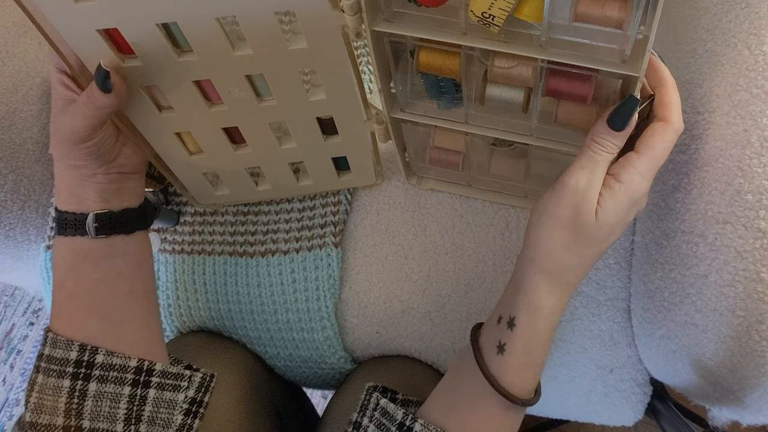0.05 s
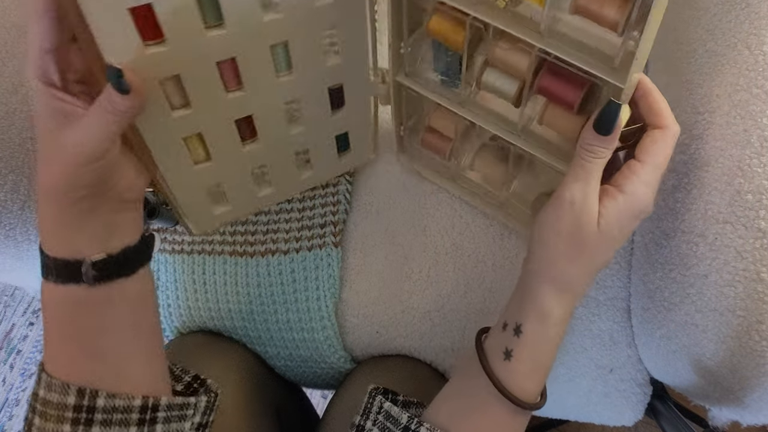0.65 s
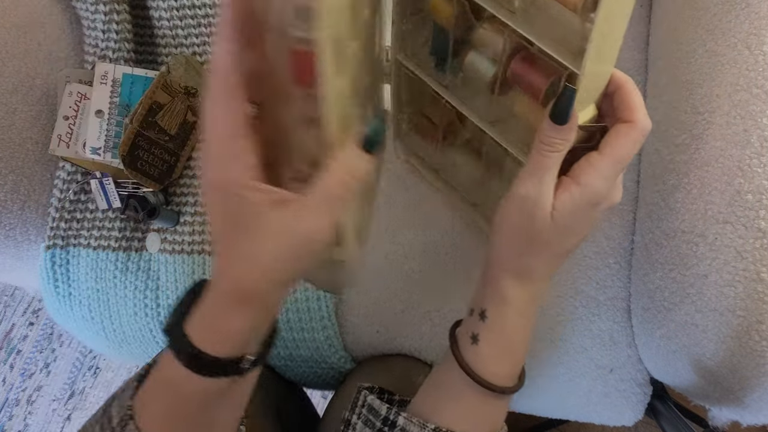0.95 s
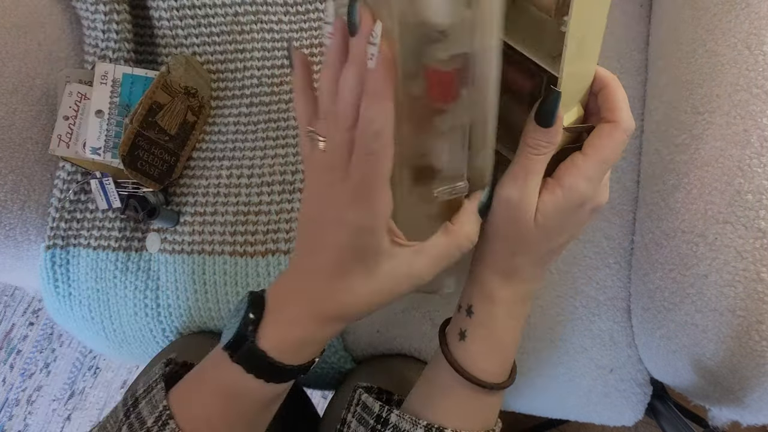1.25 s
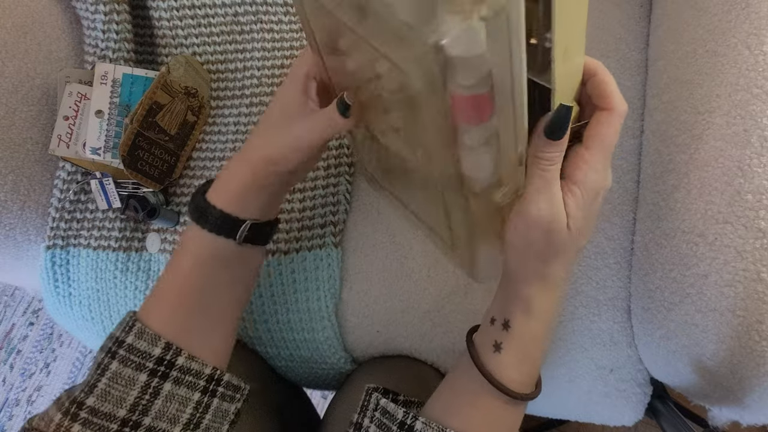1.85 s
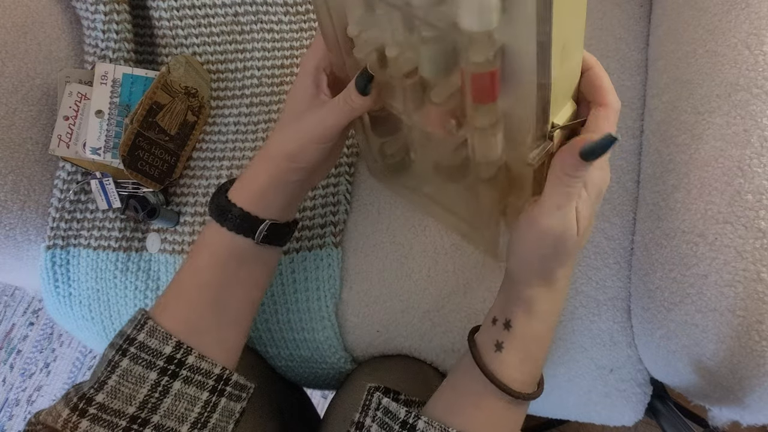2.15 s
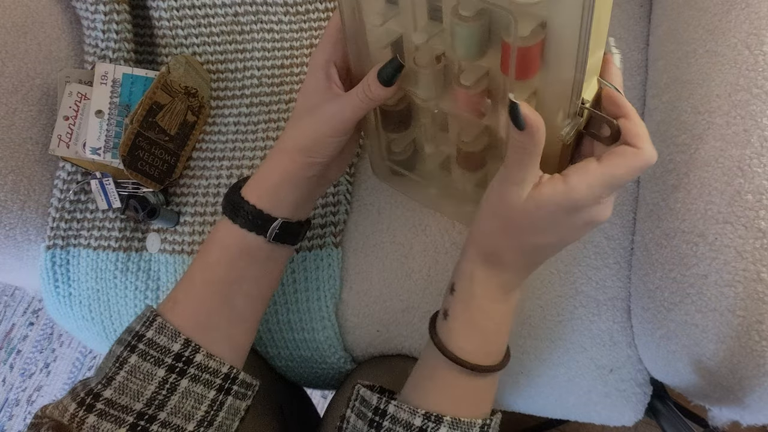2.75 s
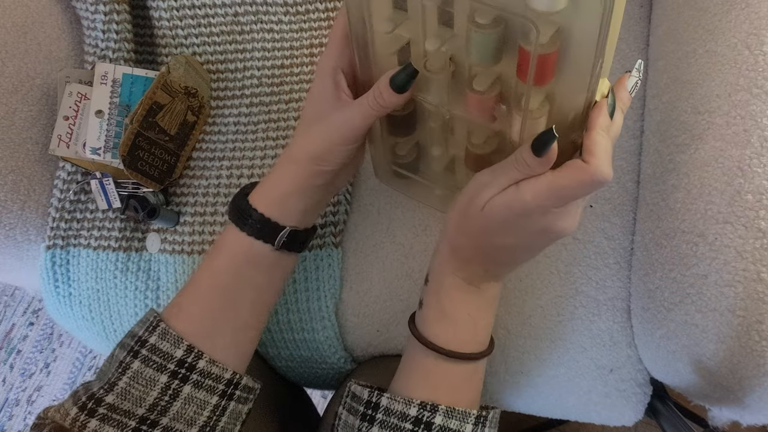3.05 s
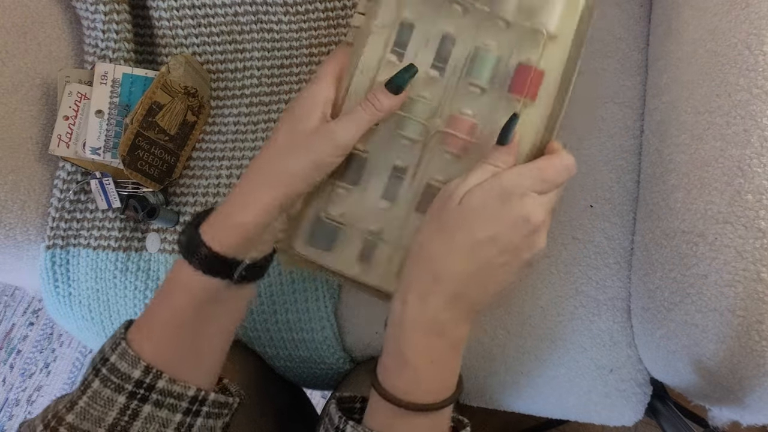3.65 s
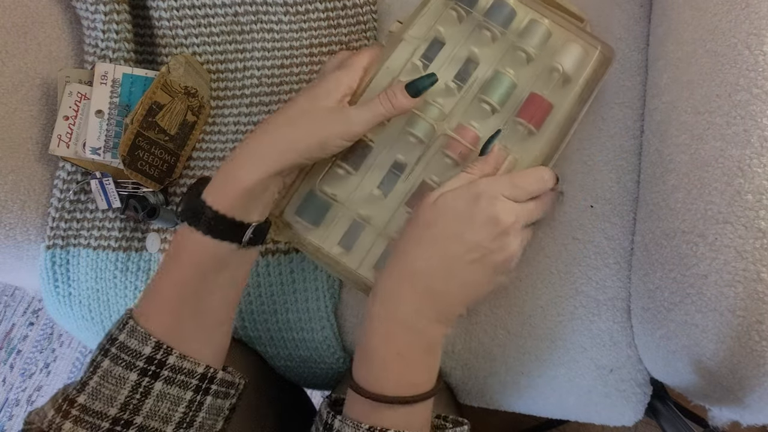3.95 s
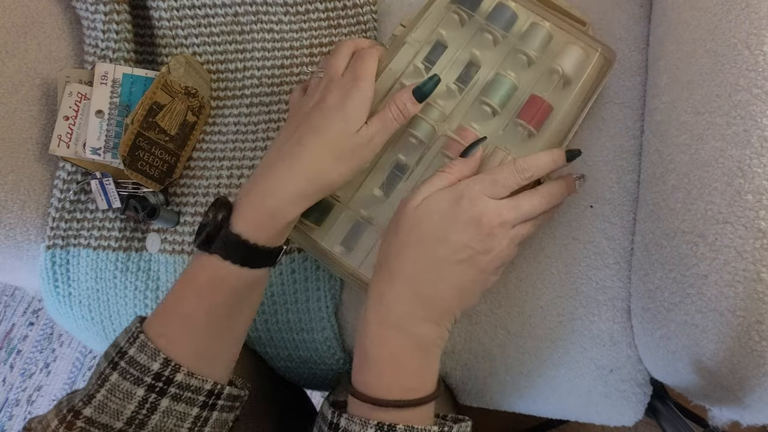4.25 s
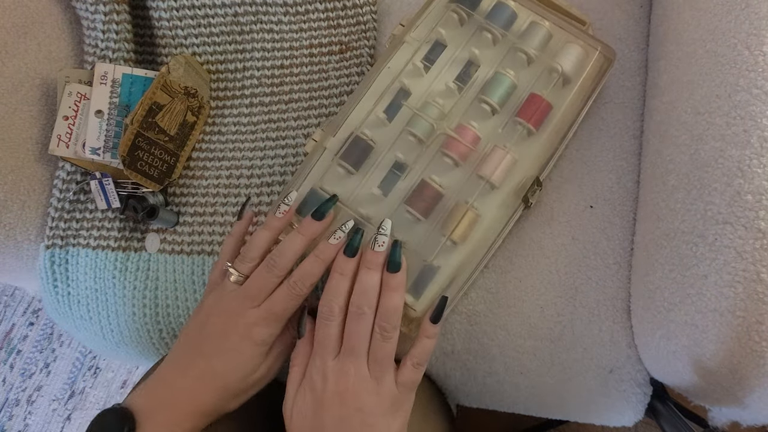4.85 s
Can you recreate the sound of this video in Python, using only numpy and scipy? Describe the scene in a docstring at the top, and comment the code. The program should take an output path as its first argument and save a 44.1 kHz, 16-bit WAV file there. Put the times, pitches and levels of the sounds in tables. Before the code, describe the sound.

Close up in a small, quiet room, hands slide softly over an open plastic case of thread spools, with light ticks. The lid clacks shut and the spools rattle briefly inside. Two latches snap one after the other, the second with a slight metallic ring. The case is laid on a sofa with soft knocks, pats and strokes, while a very faint engine drone rises far outside.

```python
"""A small, soft room; a stereo microphone pair close to a plastic case of thread spools on a sofa.
Hands slide over the open shell and swing the lid; nails and spools tick, palms pat, the frame squeaks.
Near 2 s the halves clack together and the spools rattle in their trays, while far outside an engine
slowly gathers speed. Two latches snap, near 3 s and 3.5 s, and the case is laid flat with soft knocks
and strokes. Knocks and rubbing take their colour from the resonances of the hollow shell."""
import sys
import numpy as np
from scipy import signal
from scipy.fft import rfft, irfft, next_fast_len
from scipy.io import wavfile
from scipy.ndimage import uniform_filter1d

SR = 44100
rng = np.random.default_rng(int(sys.argv[2]) if len(sys.argv) > 2 else 0)


def generate_wav(signal):
    """Clip the signal to [-1, 1] and save it as 16-bit WAV at the path in sys.argv[1]."""
    frames = np.transpose(np.atleast_2d(signal))
    scaled = np.clip(frames, -1, 1) * 32767
    pcm = np.round(scaled).astype(np.int16)
    wavfile.write(sys.argv[1], SR, pcm)


N = 225517
RING_SAMPLES, ONSET_SAMPLES = 22050, 882
SWING_END_S, SHUT_AT_S = 0.95, 2.05
MIC_LAG_S = 7.5e-5  # sound reaches the left microphone first


def amp(db):
    """Decibels to amplitude."""
    return 10 ** (np.asarray(db) / 20)

def unit_rms(x):
    """Scales to rms 1."""
    return x / np.sqrt(np.mean(x ** 2) + 1e-20)

def at_level(x, db, size=ONSET_SAMPLES):
    """Sets the rms of a sound's first moments."""
    return x * amp(db) / np.sqrt(np.mean(x[:, :size] ** 2) + 1e-20)

def curve_at(points, hz):
    """Reads a table on a log-frequency axis."""
    table_hz, value = np.transpose(points)
    return np.interp(np.log(hz + 1), np.log(table_hz + 1), value)

def bins(size):
    """Frequencies of a spectrum of this many samples."""
    return np.fft.rfftfreq(size, 1 / SR)

def add(mix, start_s, sound):
    """Lays a stereo sound into the mix."""
    part = mix[:, round(start_s * SR):][:, :sound.shape[1]]
    part += sound[:, :part.shape[1]]

def panned(x, left_db):
    """Makes the left microphone louder than the right by left_db."""
    return x * amp(np.array([[left_db], [-left_db]]) / 2)

def band(x, lo_hz, hi_hz, order=3):
    """Causal band-pass."""
    sos = signal.butter(order, [lo_hz, min(hi_hz, SR / 2 - 1000)], "band", fs=SR, output="sos")
    return signal.sosfilt(sos, x)

def coloured(x, gain_at):
    """Minimum-phase filter; gain_at gives its gain at each frequency."""
    log_gain = np.log(gain_at(abs(np.fft.fftfreq(4096, 1 / SR))))
    taps = np.fft.ifft(np.exp(np.conj(signal.hilbert(log_gain)))).real
    return signal.fftconvolve(x, taps[None, :len(taps) // 2], axes=1)[:, :x.shape[1]]

# How alike the two microphones hear the room: frequency_hz, coherence
MIC_COHERENCE = [(50, 0.82), (300, 0.9), (700, 0.69), (1500, 0.23), (4000, 0.24), (15000, 0.072)]
def pair_noise(size, gain=1):
    """Noise at two nearby microphones: partly alike, the right one a little late."""
    hz = bins(size)
    left, unrelated = rfft(rng.standard_normal((2, size)))
    alike = np.clip(curve_at(MIC_COHERENCE, hz), 0, 1)
    right = (alike * left + np.sqrt(1 - alike ** 2) * unrelated) * np.exp(-2j * np.pi * hz * MIC_LAG_S)
    return unit_rms(irfft(np.array([left, right]) * gain, size))

# Quiet air all around the microphones: frequency_hz, gain_db
AIR_SPECTRUM = [(20, -29), (38, -23.5), (54, 4), (75, -3), (110, -6.5), (170, -16.5), (300, -22),
                (600, -23), (2000, -27.5), (6000, -29), (16000, -46)]
def room_air(level_db=-62.5):
    """The room's steady, low hush."""
    hush = pair_noise(N, amp(curve_at(AIR_SPECTRUM, bins(N))))
    return panned(amp(level_db) * hush, left_db=1.5)

# Firmness of the hold, which keeps the shell creeping under hands and on the cushion: time_s, level_db
GRIP_FIRMNESS = [(0, -69), (.4, -70), (.7, -68), (1.05, -51.5), (1.22, -64), (1.38, -58), (1.47, -62.5),
                 (1.6, -54), (1.85, -61.5), (2.05, -52.5), (2.35, -65), (2.6, -62), (2.92, -53),
                 (3.35, -57), (3.7, -50.5), (3.9, -54), (4.5, -53), (5.11, -56)]
# Hands sliding over the case, close by: fastest_s, swell_s, fade_s, scrape_db, hiss_db
HAND_SLIDES = [(.03, 0.15, 0.091, -64, -67), (.48, 0.029, 0.11, -57, -60.5), (.67, 0.28, 0.21, -51.5, -56),
               (.855, 0.11, 0.16, -49.5, -54.5), (1.04, 0.11, 0.18, -50.5, -54),
               (1.22, 0.16, 0.25, -62.5, -56.5), (1.285, 0.036, 0.18, -51.5, -49),
               (1.539, 0.074, 0.086, -49, -51), (1.722, 0.038, .04, -51, -42),
               (1.748, 0.042, 0.065, -46, -57), (1.859, 0.11, 0.15, -54.5, -50),
               (2.08, 0.31, 0.16, -47, -51.5), (2.51, 0.073, 0.091, -56.5, -60),
               (2.635, 0.086, 0.092, -55.5, -55), (2.77, 0.16, 0.092, -53, -58),
               (2.89, 0.29, 0.84, -57.5, -57), (3.25, 0.097, 0.25, -77, -70),
               (3.78, 0.68, 0.17, -58.5, -79), (4.14, 0.11, 0.14, -64, -51.5), (4.5, 0.15, 0.14, -55, -47),
               (4.74, 0.43, 0.18, -62, -51)]
def hand_motion(firm_db=-52.5, crest_sharpness=1.2):
    """Strength of murmur, scrape and hiss: the grip's creep plus slides that swell and fade."""
    t = np.arange(0, N, 64) / SR
    grip_db = np.interp(t, *np.transpose(GRIP_FIRMNESS))
    scrape_power, hiss_power = 0, 0
    for fastest_s, swell_s, fade_s, scrape_db, hiss_db in HAND_SLIDES:
        speed = np.interp(t, [fastest_s - swell_s, fastest_s, fastest_s + fade_s], [0, 1, 0])
        scrape_power += (amp(scrape_db) * speed ** crest_sharpness) ** 2
        hiss_power += (amp(hiss_db) * speed ** crest_sharpness) ** 2
    creep_hiss_db = firm_db - 11.5 + 1.3 * (grip_db - firm_db)  # a power law of the grip
    murmur = np.sqrt(amp(grip_db) ** 2 + amp(-10) ** 2 * scrape_power)
    scrape = np.sqrt(amp(grip_db - 7) ** 2 + scrape_power)
    hiss = np.sqrt(amp(creep_hiss_db) ** 2 + hiss_power)
    return [np.interp(np.arange(N) / SR, t, strength) for strength in (murmur, scrape, hiss)]

def resonances(modes, hz, q):
    """Gain of the walls when hands damp each mode to a width of its pitch over q."""
    return sum(amp(db) / (1 + (2 * q * (hz - pitch_hz) / pitch_hz) ** 2) for pitch_hz, db, _ in modes)

def friction(spectrum, walls, grain_db, grain_samples):
    """Tiny uneven slips, heard through the walls."""
    size = next_fast_len(N)
    roughness = unit_rms(uniform_filter1d(rng.standard_normal(size), grain_samples))
    slips = pair_noise(size) * amp(grain_db * roughness)
    gain = amp(curve_at(spectrum, bins(size))) * walls
    return unit_rms(irfft(rfft(slips) * gain, size)[:, :N])

# The rubbed shell's low murmur and midrange scrape: frequency_hz, gain_db
MURMUR_SPECTRUM = [(40, -32), (110, -6), (220, -0.5), (310, 2.5), (480, -9.5), (900, -19), (3000, -64.5)]
SCRAPE_SPECTRUM = [(150, -30.5), (450, -2), (750, -2), (1400, -1), (2600, -1.5), (4000, -9), (9000, -36.5)]
def rubbing(modes, hiss_spectrum, hollow_db, hiss_hollow_db):
    """Hands and cloth slide on the shell: a low murmur, a hollow scrape and a fine hiss."""
    murmur, scrape, hiss = hand_motion()
    hz = bins(next_fast_len(N))
    walls = 1 + amp(hollow_db) * resonances(modes, hz, q=31)
    damped_walls = 1 + amp(hiss_hollow_db) * resonances(modes, hz, q=18)
    low = amp(-3) * murmur * friction(MURMUR_SPECTRUM, walls, grain_db=2.5, grain_samples=600)
    mid = amp(-1.8) * scrape * friction(SCRAPE_SPECTRUM, walls, grain_db=1.5, grain_samples=90)
    high = amp(0.2) * hiss * friction(hiss_spectrum, damped_walls, grain_db=1.5, grain_samples=40)
    return panned(low + mid, left_db=0.89) + panned(high, left_db=1.2)

# Skin gripping the open halves, then palms on the flat lid: frequency_hz, gain_db
GRIP_HISS = [(600, -34.5), (2500, -18.5), (4000, 2.5), (6500, 3), (10000, -1.5), (13000, -3.5),
             (16000, -1.5)]
PALM_HISS = [(600, -32), (2500, -3), (4000, 2), (6500, 5), (10000, -1), (13000, 0), (16000, -4.5)]
# Modes of the swinging lid and hinge, the open halves and the shut box: pitch_hz, level_db, free_t60_s
HINGE_MODES = [(268.4, 0, .2), (600, -5, .15), (733, 4, .15), (830, -2, .15), (1250, 3, .13),
               (1414, 5, .15), (1477, 3.5, .15), (1770, 1, .13), (2540, -10, .15), (2920, 4, .15),
               (3420, -0.5, .15), (5000, -10, .1), (7930, -4, .15)]
OPEN_MODES = [(214, -2.5, 0.33), (257.5, -13, 0.51), (366.3, -1, 0.053), (513, 2, 0.12), (586, -0.5, .1),
              (748, -1.5, 0.13), (1171, 2, 0.1), (1392, 1, 0.12), (1550, -1, 0.29), (1820, -14.5, 0.08),
              (2077, -11, 0.16), (2480, -7, 0.16), (3025, -10.5, .17), (3500, -4, .15), (4000, -12, .13),
              (4500, -5, 0.077), (4970, -2.5, .11), (6260, 1.5, 0.093), (7750, -10.5, .1)]
SHUT_MODES = [(108, -2, 0.37), (185.6, -7, 0.053), (227.6, 1.5, 0.18), (262.8, -0.5, 0.22),
              (303.2, 1.5, 0.34), (375, -4.5, 0.15), (434.5, -6, 0.15), (446.8, -5.5, 0.25),
              (536, -6, 0.23), (665, -8.5, 0.085), (745, -10, 0.065), (862, -4, 0.14), (972, 0, 0.11),
              (1189, -2, 0.13), (1295, 0.5, 0.19), (1580, -8.5, 0.13), (1802, -2, .13), (2013, -6.5, .14),
              (2613, -7, .1), (3140, -6, 0.11), (3520, -5.5, .14), (4020, -1, .12), (4680, -2.5, .1),
              (5180, 7, 0.2), (5940, 1.5, .1), (6900, -2.5, .1), (7770, -11.5, 0.33), (9300, -6.5, .07)]
def handling():
    """The rubbing changes colour as the lid swings, is gripped, and meets the tray to make one box."""
    t = np.arange(N) / SR
    swung, shut = (np.clip((t - start_s) / 0.02, 0, 1) for start_s in (SWING_END_S, SHUT_AT_S))
    lid = rubbing(HINGE_MODES, GRIP_HISS, hollow_db=6, hiss_hollow_db=8)
    halves = rubbing(OPEN_MODES, GRIP_HISS, hollow_db=7.5, hiss_hollow_db=-5.5)
    box = rubbing(SHUT_MODES, PALM_HISS, hollow_db=2, hiss_hollow_db=-24)
    return np.sqrt(1 - swung) * lid + np.sqrt(swung - shut) * halves + np.sqrt(shut) * box

def case_ring(modes, spot_hz, favour_db=7, damping=1.54):
    """Modes ring down after a blow; those near the struck spot's pitch gain up to favour_db."""
    hz, db, t60_s = np.transpose(modes)[:, :, None]
    t = np.arange(RING_SAMPLES) / SR
    scatter, skew = rng.standard_normal((2, len(modes), 1))
    db = db + 2 * scatter + favour_db * np.exp(-(np.log(hz / spot_hz) / 0.17) ** 2)
    left = amp(db) * np.exp((2j * np.pi * hz - np.log(1000) * damping / t60_s) * t)
    phase_spread = np.sqrt(np.clip(2 * (1 - curve_at(MIC_COHERENCE, hz)), 0, None))
    right = left * np.exp(-1j * (2 * np.pi * hz * MIC_LAG_S + skew * phase_spread))
    return np.array([left.sum(0).real, right.sum(0).real])

# Reverberation of the small, soft room around the sofa: frequency_hz, t60_s
ROOM_DECAY = [(100, 0.32), (300, 0.34), (1000, 0.22), (3000, 0.21), (7000, 0.2), (15000, 0.17)]
def room_tail(build_s=0.0013):
    """Diffuse reflections build up, then die away, faster in the treble."""
    hz, t, spectra = signal.stft(pair_noise(RING_SAMPLES), SR, nperseg=256)
    decay = np.exp(-np.log(1000) * t / curve_at(ROOM_DECAY, hz)[:, None])
    tail = signal.istft(spectra * decay, SR)[1][:, :RING_SAMPLES]
    return tail * (1 - np.exp(-np.arange(RING_SAMPLES) / SR / build_s))

# Colour of a knock on the plastic at close range: frequency_hz, gain_db
CONTACT_SPECTRUM = [(50, -25), (100, -4), (150, -0.5), (210, 5), (400, 5), (600, 4), (1500, -5.5),
                    (2400, -4.5), (5000, -7), (8000, -2.5), (10500, -8.5), (13500, -5.5), (16000, -14.5)]
def strike(chatter_s, start_s, spot_hz, ring_db, room_db):
    """A sharp touch and its chatter sound through the walls, open or shut; modes and room ring on."""
    modes = OPEN_MODES if start_s < SHUT_AT_S else SHUT_MODES
    t = np.arange(RING_SAMPLES) / SR
    force = pair_noise(RING_SAMPLES) * np.exp(-t / chatter_s) * np.sqrt(0.0015 / chatter_s)
    first_touch = 7.2 * np.exp(-chatter_s / 0.0027)
    force[[0, 1], [0, round(MIC_LAG_S * SR)]] += first_touch
    wall_gain = lambda hz: 0.9 + 0.5 * amp(8) * resonances(modes, hz, q=15.4)
    walls = coloured(force + amp(room_db) * room_tail(), wall_gain)
    ring = amp(ring_db) * case_ring(modes, spot_hz)
    spot_lift_db = lambda hz: 4 / (1 + (7 * (hz / spot_hz - 1)) ** 2)
    return coloured(walls + ring, lambda hz: amp(curve_at(CONTACT_SPECTRUM, hz) + spot_lift_db(hz)))

# Nails and shifting spools, close by: start_s, level_db, pitch_hz, chatter_decay_s
LIGHT_TOUCHES = [(0.4628, -58.5, 1470, 0.0055), (0.837, -52.5, 1480, 0.023), (1.273, -57.5, 1920, 0.024),
                 (1.378, -51, 1380, 0.011), (1.705, -46.5, 9100, 0.0049), (1.733, -43, 5950, 0.0065),
                 (1.914, -51.5, 625, 0.0027), (2.468, -61.5, 1250, 0.014), (2.7326, -50.5, 7600, 0.0029),
                 (2.863, -50, 2090, 0.016), (3.352, -52.5, 1240, 0.0068), (3.915, -56, 1200, 0.002),
                 (3.973, -51.5, 950, 0.019), (4.228, -52.5, 1270, 0.028), (4.39, -50.5, 1450, 0.0051),
                 (4.4742, -50.5, 600, 0.006), (4.724, -51, 6650, 0.014), (4.8994, -49, 800, .003)]
def ticks(band_ratio=2.05):
    """Light touches ring only a part of the case's range."""
    out = np.zeros((2, N))
    for start_s, db, hz, chatter_s in LIGHT_TOUCHES:
        hit = strike(chatter_s, start_s, hz, ring_db=-33, room_db=-18)
        tick = band(hit, hz / band_ratio, hz * band_ratio, order=2)
        add(out, start_s, at_level(tick, db))
    return panned(out, left_db=2)

# Borders of a blow's five bands (thump, knock, clack, crack, tick): frequency_hz
BLOW_BAND_EDGES = [60, 450, 1100, 2400, 6000, 16000]
def balanced(hit, levels_db):
    """Bends a hit's spectrum smoothly so that each band starts near its level."""
    edges = list(zip(BLOW_BAND_EDGES, BLOW_BAND_EDGES[1:]))
    centres_hz, gains_db = np.sqrt(np.prod(edges, axis=1)), np.zeros(len(edges))
    gain_at = lambda hz: amp(curve_at(np.c_[centres_hz, gains_db], hz))
    for _ in range(3):
        onset = coloured(hit[:, :ONSET_SAMPLES], gain_at)
        onset_db = np.array([10 * np.log10(np.mean(band(onset, lo, hi) ** 2)) for lo, hi in edges])
        step_db = levels_db - onset_db
        common_db = np.median(step_db)
        gains_db += common_db + np.clip(step_db - common_db, -9, 9)
    return coloured(hit, gain_at)

# How a blow spreads over those five bands: offset_db, weight_share, hardness_share
BAND_SHARES = [(0, 1, 0), (-3, 0.17, 0.048), (-0.5, 0, 0), (3.5, 0, .56), (-1, 0.021, 0.98)]
# Hard blows on the case, close by; weight is bass over clack, hardness is treble over clack:
# start_s, clack_db, weight_db, hardness_db, pitch_hz, chatter_decay_s, rise_s, left_db
HARD_BLOWS = [(0.951, -50, 0.5, -5, 900, 0.0096, 0.00021, 4.5),
              (1.3572, -57, -4, 7, 2430, 0.011, 0.00033, 3),
              (1.9314, -17.5, -22.5, -14.5, 1650, 0.0074, 0.0012, 3),
              (2.0894, -32.5, -7, -17, 1380, 0.0099, 0.00083, 3),
              (2.0981, -32, -5, -20.5, 1000, 0.025, .00055, 0.5),
              (2.1196, -34.5, 0, -22, 1280, 0.01, 0.00071, 2),
              (2.1493, -21, -2.5, -17.5, 205, 0.004, 0.00012, 3),
              (2.249, -54.5, 1, -9, 2450, 0.0069, 0.00071, 5),
              (2.968, -18, 3.5, -4, 5200, 0.0043, .0002, 0.5),
              (3.4902, -24, -5, 2.5, 4000, 0.0025, 0.0011, 1),
              (3.834, -39.5, -5, -27, 1200, 0.0091, 0.00093, 4.5),
              (4.0076, -49, 0, -22, 1300, 0.017, 0.0045, 1.5),
              (4.056, -34.5, -6, -18, 454, 0.0064, 0.0061, 2.5),
              (4.079, -44.5, -7, -9, 1310, 0.011, .0007, 5),
              (4.094, -32, -19, -23.5, 1340, 0.0056, 0.0071, 2.5),
              (4.123, -43.5, -4, -22, 1310, 0.0074, 0.00058, 0),
              (4.7044, -50, -0.5, 13, 6270, 0.0011, 0.001, 3.5)]
def blows():
    """Lid, latches and tumbling spools hit the shell; a glancing blow swells briefly before it rings."""
    out, t = np.zeros((2, N)), np.arange(1, RING_SAMPLES + 1) / SR
    offset_db, weight_share, hardness_share = np.transpose(BAND_SHARES)
    for start_s, clack_db, weight_db, hardness_db, hz, chatter_s, rise_s, left_db in HARD_BLOWS:
        hit = strike(chatter_s, start_s, hz, ring_db=-34.5, room_db=-21) * (1 - np.exp(-t / rise_s))
        levels_db = clack_db + offset_db + weight_db * weight_share + hardness_db * hardness_share
        add(out, start_s, panned(balanced(hit, levels_db), left_db))
    return out

# Hands and sofa cushion meeting the shell: start_s, level_db, pitch_hz, damping_t60_s
SOFT_PATS = [(1.026, -52.5, 257, 0.29), (1.122, -56.5, 215, 0.11), (1.623, -61, 366, 0.14),
             (2.873, -49.5, 315, .2), (3.4857, -32, 212, 0.047), (3.554, -40.5, 308, 0.12),
             (3.759, -48.5, 310, 0.33), (4.4725, -46, 348, 0.4), (4.604, -46, 243, 0.35),
             (4.693, -48.5, 180, .15), (4.726, -47.5, 235, 0.27), (4.903, -40.5, 140, 0.22),
             (4.944, -50.5, 127, 0.069)]
def pats(band_ratio=1.28, rise_s=0.0014, chatter_s=0.005):
    """Soft, slow contacts wake only the low modes, and the resting hand stills them."""
    out, t = np.zeros((2, N)), np.arange(RING_SAMPLES) / SR
    for start_s, db, hz, t60_s in SOFT_PATS:
        hit = strike(chatter_s, start_s, hz, ring_db=-38, room_db=-20.5)
        envelope = (1 - np.exp(-t / rise_s)) * np.exp(-np.log(1000) * t / t60_s)
        pat = band(hit * envelope, hz / band_ratio, hz * band_ratio, order=2)
        add(out, start_s, at_level(pat, db, size=1323))
    return panned(out, left_db=0.97)

# The frame flexing in the grip, centred between the microphones: start_s, level_db, length_s, pitch_hz
FRAME_SQUEAKS = [(1.341, -54, 0.081, 2455), (1.521, -54, 0.09, 373)]
def squeaks(width_hz=40):
    """Stick and slip keeps one mode singing for a moment."""
    out = np.zeros((2, N))
    for start_s, db, length_s, hz in FRAME_SQUEAKS:
        size = round(length_s * SR)
        resonance = 1 / (1 + (2 * (bins(size) - hz) / width_hz) ** 2)
        add(out, start_s, amp(db) * pair_noise(size, resonance) * np.hanning(size))
    return out

# An engine far outside, heard from indoors: time_s, firing_rate_hz, level_db
ENGINE_RUN = [(0, 51.4, -100), (1.5, 54.13, -66.5), (2.3, 57.64, -62), (2.899, 65.32, -65.5),
              (3.3, 71.8, -58.5), (3.601, 81.1, -57), (4.0, 87.4, -58), (4.4, 92.5, -56), (4.7, 94, -56),
              (5.11, 99.8, -61)]
# The tones of its drone: firing_rate_multiple, level_db
DRONE_TONES = [(.6, -8), (1, 0), (1.6, -5.5)]
def far_engine():
    """A low drone climbs with the firing rate, wavering in pitch and level together."""
    time_s, rate_hz, level_db = np.transpose(ENGINE_RUN)
    t = np.arange(N) / SR
    waver = unit_rms(uniform_filter1d(rng.standard_normal(N), size=4000))
    firings = np.cumsum(np.interp(t, time_s, rate_hz) * (1 + 0.016 * waver)) / SR
    drone = unit_rms(sum(amp(db) * np.sin(2 * np.pi * ratio * firings) for ratio, db in DRONE_TONES))
    return panned(drone * amp(np.interp(t, time_s, level_db) + 1.1 * waver), left_db=1.5)

# The front wall as the first latch snaps over its lip, then the second latch's metal clasp,
# both close by and a little to the left: pitch_hz, level_db, t60_s
LIP_MODES = [(224.5, 2.5, .17), (311, 7, 0.21), (386, 5, .15), (745, -0.5, 0.112), (876, 9, 0.079),
             (956, -3, .13), (1317, -1.5, 0.12), (1583, 1.5, 0.12), (1803, -3, 0.12), (3568, -2, 0.16)]
CLASP_MODES = [(2160, 1.5, 0.23), (3130, -8, .15), (3990, -5.5, .16), (4960, -10, .16), (8010, 2.5, 0.22)]
def latches():
    """Each latch leaves a brief ring of its own as it springs home."""
    out = np.zeros((2, N))
    for start_s, db, modes in (2.969, -21, LIP_MODES), (3.491, -34.5, CLASP_MODES):
        ring = case_ring(modes, spot_hz=modes[0][0], favour_db=0, damping=1)
        add(out, start_s, at_level(ring, db))
    return panned(out, left_db=2.5)

def scene():
    """The case close to the microphones; behind it, the far engine and the room's air."""
    case = blows() + latches() + ticks() + pats() + squeaks() + handling()
    return case + far_engine() + room_air()

def record(dry, cutoff_hz=16000):
    """The microphone signals are clipped at full scale, then low-passed."""
    lowpass = signal.firwin(511, cutoff_hz, window=("kaiser", 9), fs=SR)
    return signal.oaconvolve(np.clip(dry, -1, 1), lowpass[None], "same", axes=1)


dry = scene()
out = record(dry)
generate_wav(out)
```